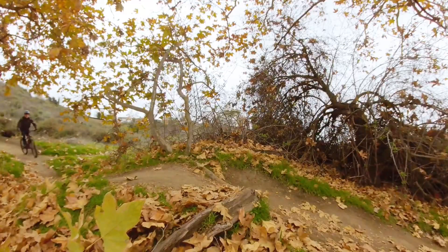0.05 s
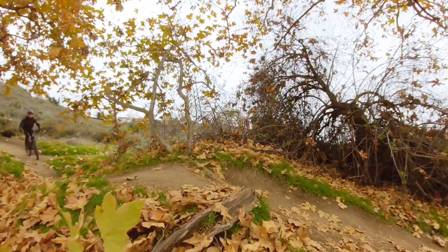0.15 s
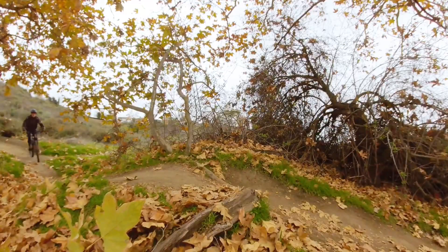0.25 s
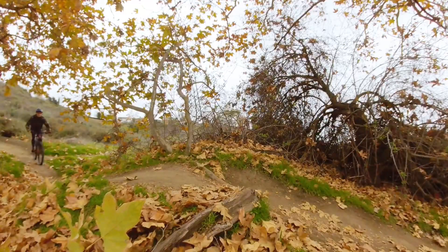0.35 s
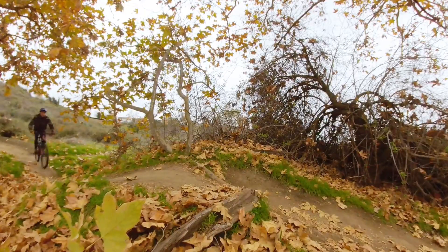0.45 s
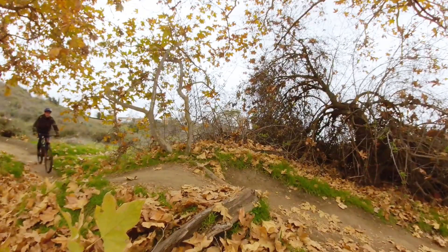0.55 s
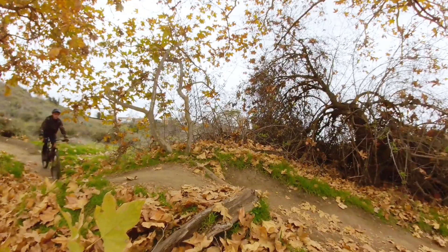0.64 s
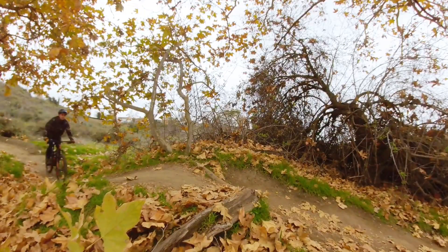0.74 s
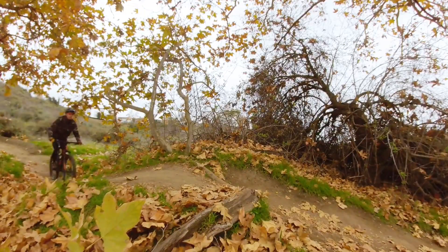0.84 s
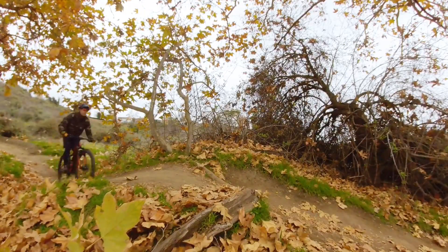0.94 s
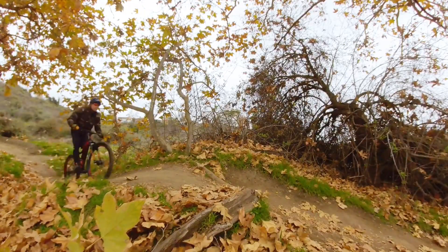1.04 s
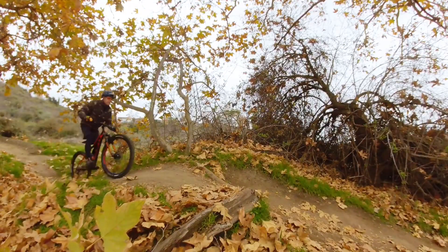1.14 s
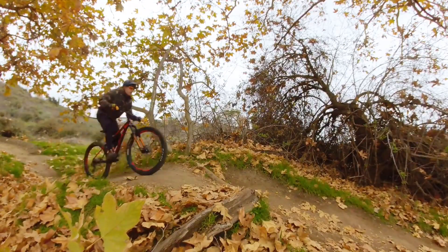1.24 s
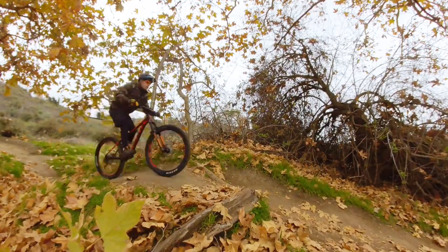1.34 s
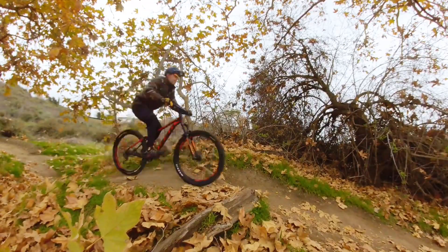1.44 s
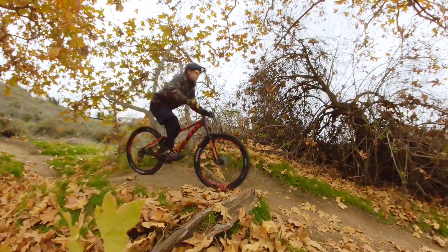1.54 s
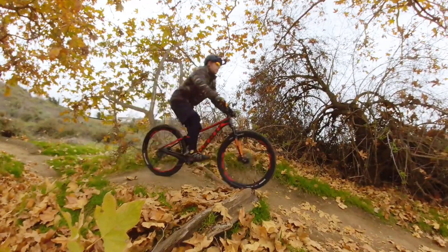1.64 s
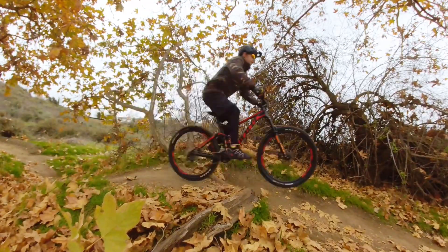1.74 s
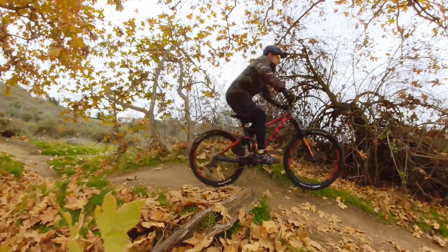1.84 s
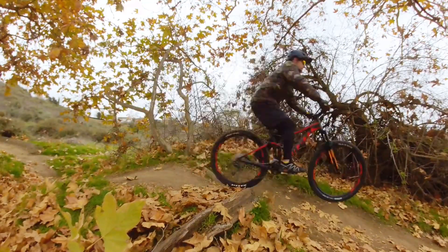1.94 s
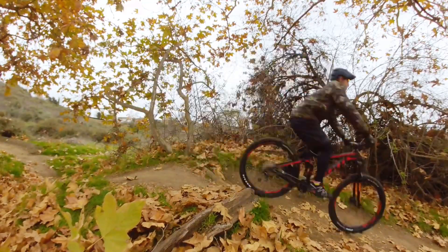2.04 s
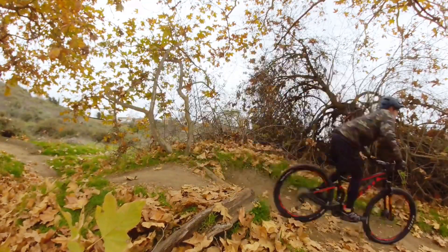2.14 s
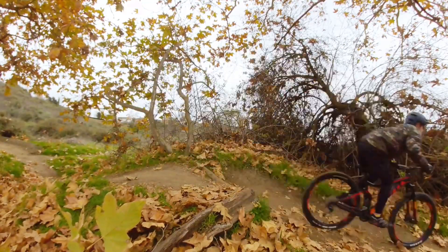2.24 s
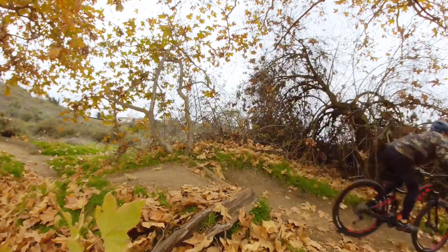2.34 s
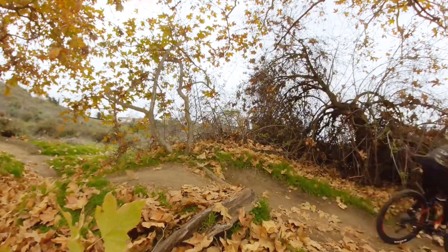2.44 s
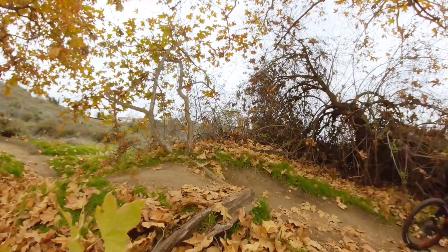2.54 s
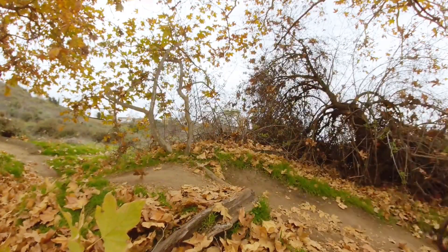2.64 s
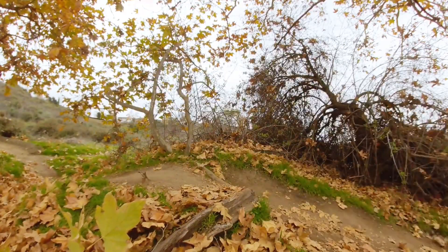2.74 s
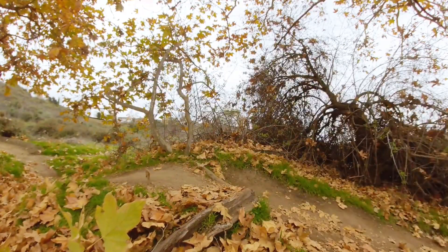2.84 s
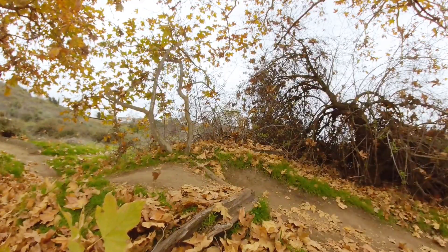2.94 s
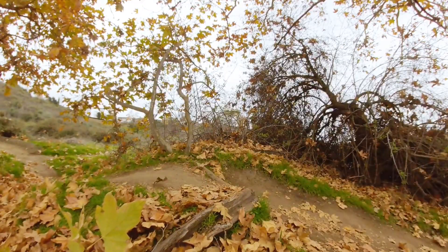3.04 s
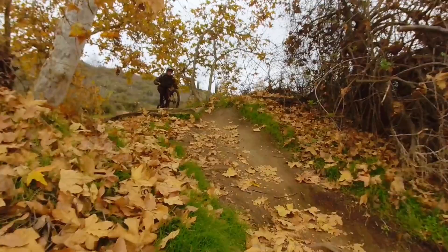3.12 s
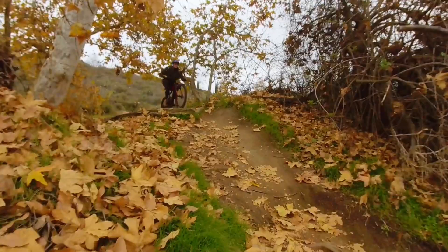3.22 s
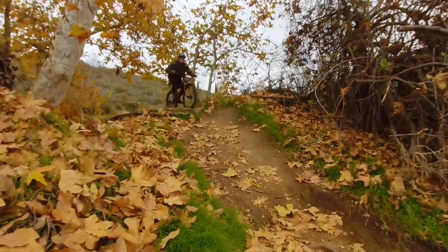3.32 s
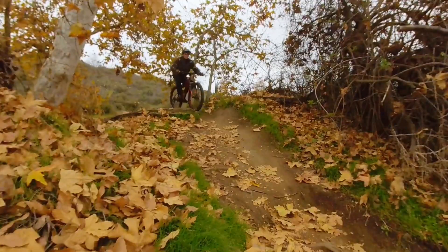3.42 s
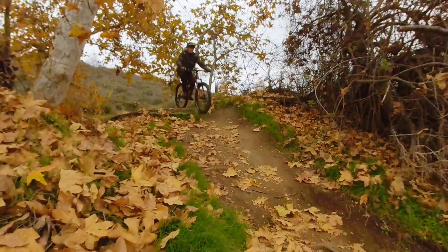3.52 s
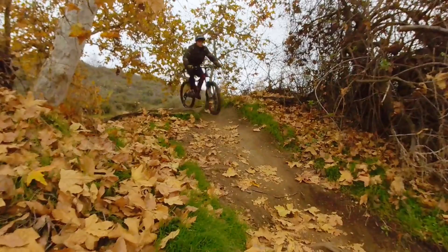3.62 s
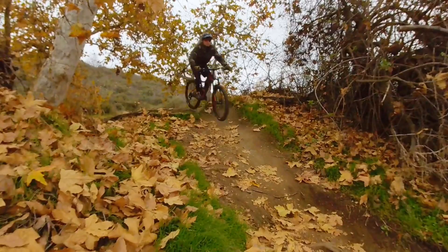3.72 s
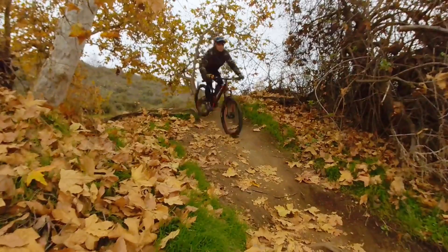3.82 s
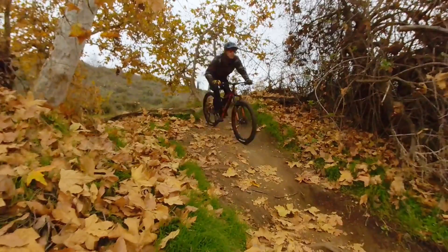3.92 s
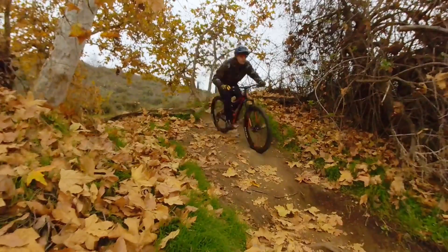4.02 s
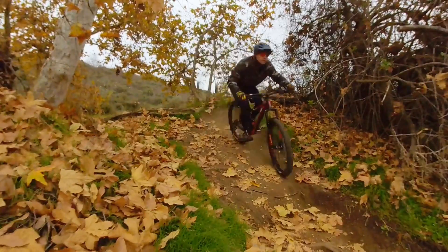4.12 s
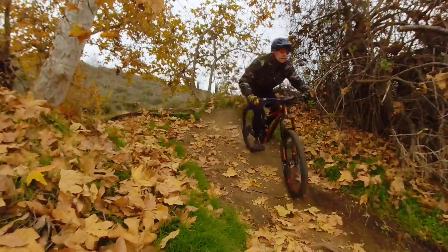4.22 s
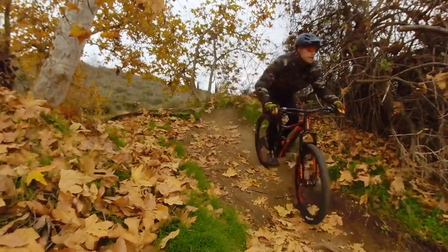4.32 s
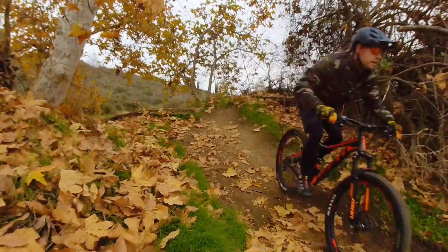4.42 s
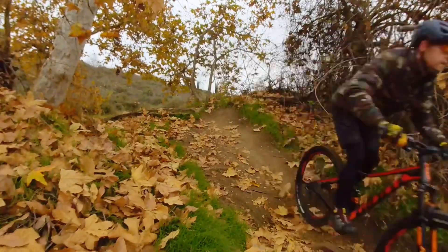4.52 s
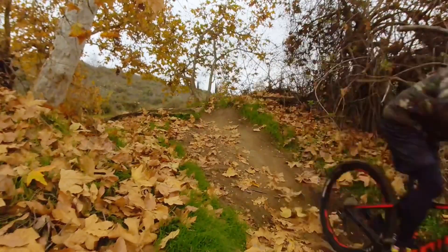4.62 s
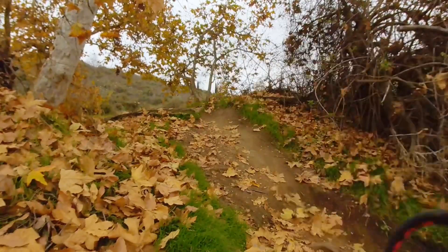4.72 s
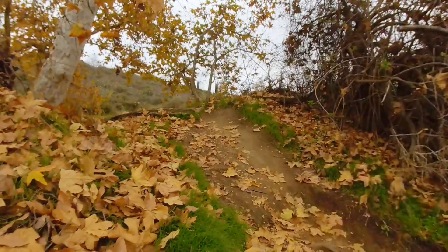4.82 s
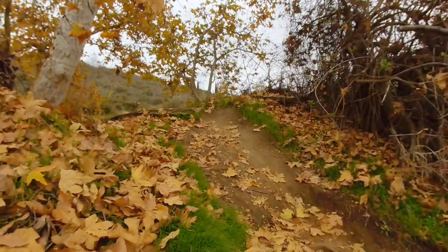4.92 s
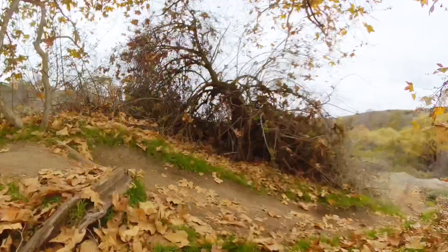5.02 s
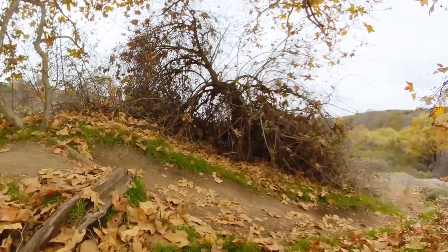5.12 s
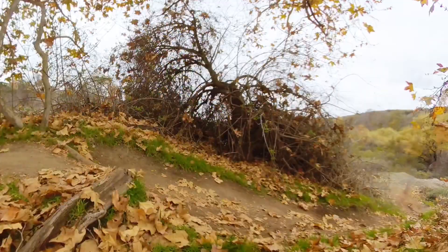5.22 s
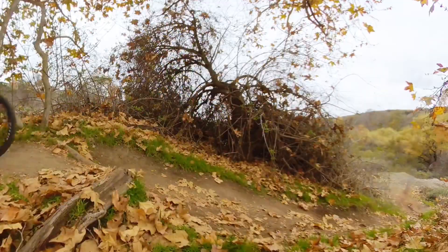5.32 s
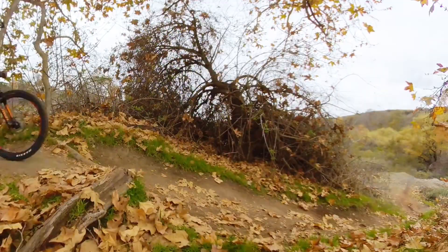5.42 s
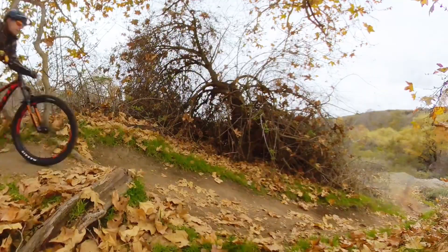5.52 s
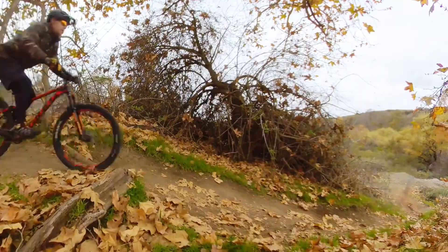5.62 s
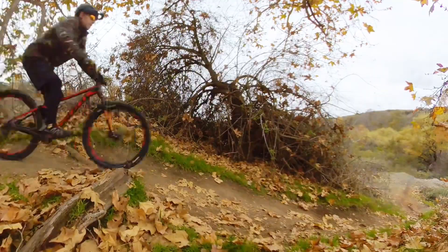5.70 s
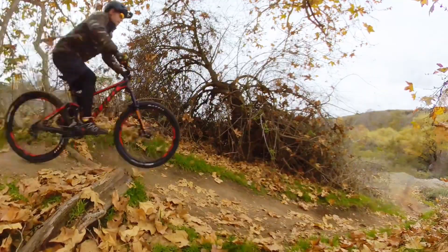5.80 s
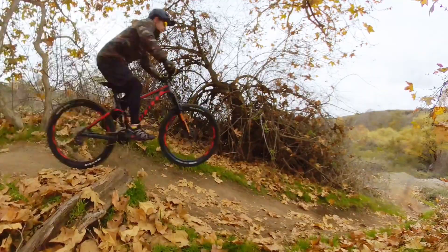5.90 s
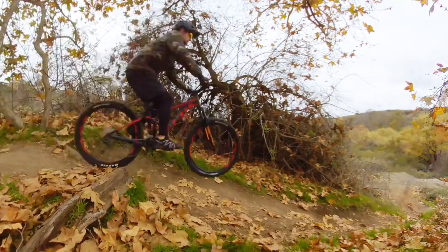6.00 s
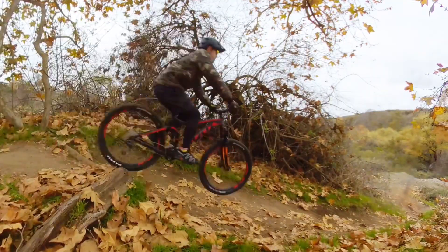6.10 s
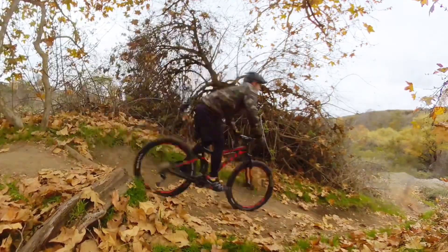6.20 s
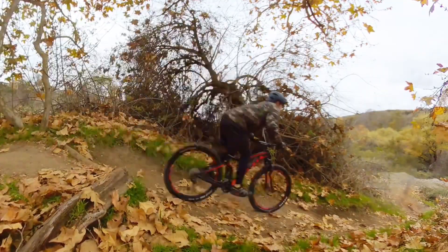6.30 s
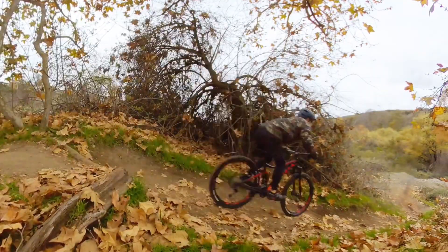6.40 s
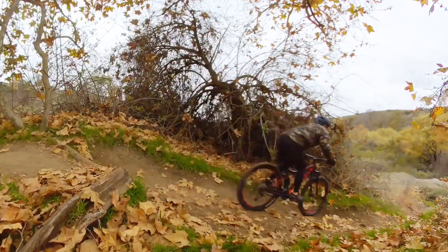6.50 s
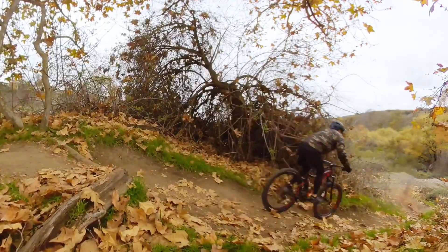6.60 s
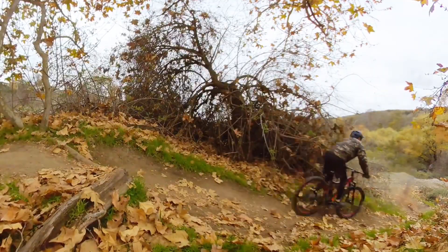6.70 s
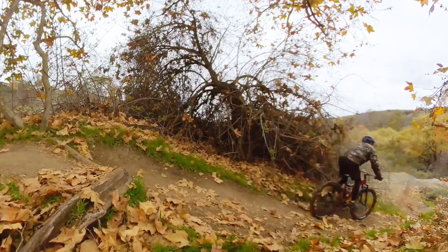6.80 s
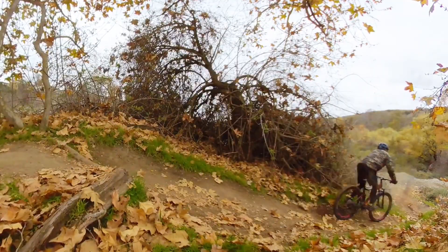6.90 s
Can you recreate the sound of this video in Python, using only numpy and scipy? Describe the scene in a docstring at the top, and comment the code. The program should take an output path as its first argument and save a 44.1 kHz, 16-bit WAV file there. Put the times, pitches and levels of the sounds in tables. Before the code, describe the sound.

A mountain bike rolls past twice over dry fallen leaves and dirt, tyres crackling, snapping and crunching, then a softer third pass begins.

```python
"""Mountain bike on a leafy dirt trail

A bike rolls past a close microphone twice; each pass fades out, then part of the first returns, softer.
Rolling: random impulses, filtered and made patchy, give tyre rumble, grit patter and leaf rustle.
Leaf snaps and crunches: bursts of impulses through chance resonances, under sharp or swelling envelopes.
High twig ticks, low tyre thuds and frame knocks: short decaying sines."""
import sys
import numpy as np
from scipy import signal
from scipy.io import wavfile
from scipy.ndimage import uniform_filter1d

SR = 44100
rng = np.random.default_rng(int(sys.argv[2]) if len(sys.argv) > 2 else 0)


def wrap_up_sound(samples):
    """Save the sound to the file named by the first command line argument, as 16-bit audio."""
    columns = np.atleast_2d(samples).T
    # keep every value between -1 and 1, then stretch to whole-number steps
    tamed = np.clip(columns, -1, 1)
    steps = np.round(tamed * 32767).astype(np.int16)
    wavfile.write(sys.argv[1], SR, steps)


def boost_factor(decibels):
    """Convert a level in decibels to a linear amplitude factor."""
    exponent = np.asarray(decibels, float) / 20
    return 10 ** exponent


N = 306693  # samples
CONTACT_REF_DB = -45


def evened(x):
    """Scales to rms 1."""
    return x / np.sqrt(np.mean(x ** 2) + 1e-20)


def read(points, hz):
    """Reads a spectrum, joined on a log-frequency axis."""
    f, value = np.transpose(points)
    return np.interp(np.log(hz + 1), np.log(f + 1), value)


def add(mix, start_s, sound):
    """Mixes a sound in at start_s."""
    part = mix[round(start_s * SR):][:len(sound)]
    part += sound[:len(part)]


def colour(x, db_at):
    """Minimum-phase filter: the phase follows from the log gain, so clicks ring after they land."""
    hz = abs(np.fft.fftfreq(4096, 1 / SR))
    log_gain = np.log(boost_factor(np.maximum(db_at(hz), -90)))
    response = np.exp(np.conj(signal.hilbert(log_gain)))
    taps = np.fft.ifft(response).real[:2048]
    return signal.oaconvolve(x, taps)[:len(x)]


def cracks(size, per_s, spread_db):
    """Tiny fractures at random moments, most small, a few large."""
    when, how_big = rng.random((2, size))
    strength = rng.standard_normal(size)
    rarity = -np.log(np.maximum(how_big, .03))  # bounds the largest
    return strength * (when < per_s / SR) * boost_factor(spread_db * rarity)


def patchy(x, patchy_db, size, bins, frames):
    """Uneven ground: random patches in time and pitch swell and sink."""
    z = signal.stft(x, nperseg=size)[2]
    patches = rng.standard_normal(z.shape[::-1]).T
    patches = uniform_filter1d(patches, bins, 0)
    patches = evened(uniform_filter1d(patches, frames, 1))
    return signal.istft(z * boost_factor(patchy_db * patches), nperseg=size)[1][:len(x)]


def level(follows, db, swells):
    """A layer follows ground contact (dB per dB, db at the reference); bell-shaped swells add power."""
    # bite of the tread on dirt, from nearness and load, one list a pass: t/s, level/dB
    contact_passes = [
        [(0, -48.5), (0.7, -47), (1.35, -48), (1.72, -41.5), (1.87, -54), (1.93, -44.5), (2.03, -40.5),
         (2.13, -33), (2.4, -46.5), (2.6, -44.5), (2.75, -50), (2.92, -48), (3.0, -54), (3.05, -48)],
        [(3.06, -57), (3.4, -55.5), (3.5, -47.5), (3.66, -60), (3.88, -59.5), (3.92, -43), (4.33, -37.5),
         (4.44, -31), (4.6, -34), (4.77, -37), (4.885, -32.5), (4.91, -31.5)],
    ]
    t = np.arange(N) / SR
    contact_db = np.interp(t, *np.transpose(contact_passes[0] + contact_passes[1]))
    power = boost_factor(2 * (db + follows * (contact_db - CONTACT_REF_DB)))
    for centre_s, swell_db, length_s in swells:
        power = power + boost_factor(2 * swell_db) * np.exp(-(2.5 * (t - centre_s) / length_s) ** 2)
    return np.sqrt(power)


def tyre_db(hz):
    """Spectrum of the knobs' thud with the modes of the air-filled tyre standing on it."""
    # thud of knobs on dirt: f/Hz, relative density/dB
    thud_points = [(30, -37.5), (85, -26), (130, -3), (170, 1), (400, -1.5), (900, -19), (1500, -29.5)]
    # tyre modes: f/Hz, width/Hz, level re thud/dB
    tyre_modes = [(173.5, 35, 9), (215, 20, 10)]
    peaks = sum(boost_factor(2 * db) / (1 + (2 * (hz - f) / width_hz) ** 2) for f, width_hz, db in tyre_modes)
    return read(thud_points, hz) + 10 * np.log10(1 + peaks)


def tyre_rumble():
    """Knobs thud on dirt into the tyre; the deepest ring varies apart from the rest."""
    # gain below 270 Hz: t/s, gain/dB
    deep_points = [(0.198, -3), (1.2, -14.5), (1.6, -1), (2.6, 0.5), (3.1, -2)]
    # wheel loaded by a dip or root, tyre booms: t/s, level/dB, length/s
    jolts = [(1.05, -37.5, 0.56), (1.914, -35, 0.034), (2.15, -25.5, 0.033), (2.306, -38.5, 0.12),
             (2.8, -41.5, 0.29), (4.021, -35.5, 0.2), (4.342, -39.5, 0.13), (4.55, -32, 0.1),
             (4.757, -31.5, 0.12)]
    rumble = colour(patchy(cracks(N, 2000, 0.46), 3.3, size=1024, bins=3, frames=5), tyre_db)
    deep = signal.oaconvolve(rumble, signal.firwin(2001, 270, fs=SR), "same")
    deep_gain = boost_factor(np.interp(np.arange(N) / SR, *np.transpose(deep_points)))
    rumble = rumble + deep * (deep_gain - 1)
    return evened(rumble) * level(0.77, -47.5, jolts)


def grit_patter():
    """Grit patters as sparse small impacts."""
    # grit spectrum: f/Hz, relative density/dB
    grit_points = [(180, -26.5), (330, -0.5), (749, -1.5), (1650, -7.5), (2700, -9), (6000, -23),
                   (7800, -11), (13200, -120)]
    grit = patchy(cracks(N, 4000, 0.88), 3.5, size=512, bins=2, frames=5)
    grit = colour(grit, lambda hz: read(grit_points, hz))
    return evened(grit) * level(0.97, CONTACT_REF_DB, [])


def leaf_rustle():
    """Leaves rub and tick in dense small fractures, louder in drifts."""
    # leaf spectrum: f/Hz, relative density/dB
    rustle_points = [(900, -26), (2700, -3.5), (5240, -5.5), (8420, -1.5), (10700, -13.5), (14600, -12),
                     (15500, -26.5)]
    # wheel ploughs through a drift of leaves: t/s, level/dB, length/s
    drifts = [(1.013, -40.5, 0.14), (1.605, -42.5, 0.095), (1.921, -36, 0.052), (2.178, -28.5, 0.1),
              (2.575, -44, 0.26), (2.807, -40.5, 0.11), (4.028, -37, 0.13), (4.564, -28.5, 0.11),
              (4.704, -35, 0.16), (4.863, -26, 0.061)]
    rustle = patchy(cracks(N, 13000, 0.43), 3.3, size=256, bins=16, frames=4)
    rustle = colour(rustle, lambda hz: read(rustle_points, hz))
    return evened(rustle) * level(0.85, -53.5, drifts)


def shards(centre_hz, octaves, sharpness, skirt_db):
    """A leaf or heap rings at its pitch and at chance ones around it, above a broad skirt."""
    # colour at the microphone port: f/Hz, gain/dB
    port_points = [(300, 9.5), (5000, 3.5), (7800, 8), (11000, -2), (15500, -3.5)]
    ring_hz = centre_hz * 2 ** (octaves * np.r_[0, rng.standard_normal(9)])
    strength = np.r_[1, .35 * rng.random(9)]

    def db_at(hz):
        """Rings and skirt in dB, with port colour and low cut."""
        rings = strength / (1 + (2 * sharpness * (hz[:, None] / ring_hz - 1)) ** 2)
        falloff = 1 + (hz / centre_hz / 19.0) ** 3 + (centre_hz / (hz + 1) / 4.9) ** 2
        power = rings.sum(1) + boost_factor(2 * skirt_db) / falloff
        low_cut_db = -60 * np.log10(1 + 150 / (hz + 1))
        return 10 * np.log10(power) + read(port_points, hz) + low_cut_db
    return db_at


def snap(db, hz, fizz_db):
    """A broadband crack runs through a brittle leaf in a few ms; its shards ring and then settle."""
    t = np.arange(int(.2 * SR)) / SR
    ring_t60_s, settle_t60_s = 0.042, 0.3
    fracture = cracks(len(t), 15000, 1.4)
    rise = 1 - np.exp(-t / 0.0016)
    fall_db = -60 * t / ring_t60_s
    crack = evened(colour(fracture, shards(hz, 0.79, 12.0, fizz_db - 6))) * boost_factor(1.1 * fall_db)
    ring = evened(colour(fracture, shards(hz, 0.67, 6.5, fizz_db)))
    ring = ring * (.5 * boost_factor(fall_db) + boost_factor(-11.0 - 60 * t / settle_t60_s))
    return boost_factor(db - 9.0) * rise * (crack + ring)


def crunch(db, hz, length_s):
    """A clump of fractures swells and dies as the tread squeezes a heap of leaves and twigs."""
    dull_hz = 8500  # heaps lie in the dirt and lose the top that a snapping leaf keeps
    t = np.arange(int(.2 * SR)) / SR
    u = t / max(length_s, .005) * 3.16
    squeeze = u ** 2 * np.exp(2 * (1 - u)) + 0.56 * (1 - np.exp(-u)) * np.exp(-t / 0.019)
    pieces = shards(hz, 0.45, 3.6, -20)
    clump = cracks(len(t), 5000, 1.5)
    burst = colour(clump, lambda f: pieces(f) - 10 * np.log10(1 + (f / dull_hz) ** 8))
    return boost_factor(db - 7.5) * evened(burst) * squeeze


def struck_tone(db, hz):
    """A high twig tick or low tyre thud rings a few cycles, with an overtone of chance pitch."""
    t60_cycles = 10.6
    cycles = np.arange(int(.06 * SR)) / SR * hz
    overtone = np.sin(2 * np.pi * rng.uniform(2.0, 2.1) * cycles)
    ring = np.sin(2 * np.pi * cycles) + .5 * overtone
    return boost_factor(db - 60 * cycles / t60_cycles) * np.minimum(cycles, 1) * ring


def knock(db):
    """A stick or stone rings the frame tube at its modes, each detuned a little by where it is struck."""
    # frame modes: f/Hz, level/dB, t60/s
    frame_modes = [(905, 3, 0.019), (2123, -16.5, 0.026), (3574, -8.5, 0.028)]
    t = np.arange(int(.1 * SR)) / SR
    ring = 0
    for hz, mode_db, t60_s in frame_modes:
        struck_hz = hz * rng.uniform(0.96, 1.07)
        ring = ring + boost_factor(mode_db - 60 * t / t60_s) * np.sin(2 * np.pi * struck_hz * t)
    return boost_factor(db) * (1 - np.exp(-t / 0.00063)) * ring


def ramp(since_s):
    """A fader opening linearly over 0.16 s."""
    return np.clip(since_s / .16, 0, 1)


def replay(ride, t):
    """The ride delayed, softened and faded in after the second pass."""
    delay_samples, start_s, replay_db = 181139, 4.957, -6
    again = np.concatenate([np.zeros(delay_samples), ride])[:N]
    return again * boost_factor(replay_db) * ramp(t - start_s)


def scene():
    """Both passes, then part of the first again."""
    # brittle leaves cracking at once: t/s, level/dB, centre f/Hz, fizz skirt re ring/dB
    snap_events = [(0.1, -33, 5800, -14), (0.387, -30.5, 5500, -9), (0.493, -40, 7200, -12),
                   (0.62, -31, 6500, -17), (0.7534, -27, 5650, -14), (0.866, -27.5, 1210, -14),
                   (0.996, -20.5, 8500, -35), (1.199, -30.5, 6260, -32), (1.6709, -17, 2740, -9),
                   (1.763, -27, 2480, -19), (1.796, -32, 3600, -8), (1.8823, -31, 2200, -10),
                   (2.003, -28, 7500, 5), (1.9665, -22, 2580, -18), (2.138, -11, 2700, -5),
                   (2.1943, -6, 6230, 8), (2.2372, -9, 8500, -4), (2.2593, -21, 4200, -14),
                   (2.274, -5.5, 5480, -11), (2.338, -11, 8150, -3), (2.501, -22.5, 9600, -12),
                   (2.548, -26, 2350, -2), (2.612, -26.5, 3700, -21), (2.812, -18, 5130, -5),
                   (2.871, -9.5, 6900, -12), (2.872, -8, 13300, -29), (3.03, -26, 4200, -37),
                   (3.184, -43, 4530, -12), (3.509, -39, 6760, -15), (3.535, -33, 5700, -15),
                   (3.566, -33.5, 3230, -11), (4.0038, -14.5, 4440, 1), (4.0604, -1.5, 7700, -7.5),
                   (4.126, -23.5, 4500, -14), (4.231, -16, 7000, 10), (4.489, -12.5, 8700, 4),
                   (4.578, -14.5, 5450, -2), (4.598, -20, 7440, -25), (4.62, -2, 8250, -6.5),
                   (4.635, -11, 7400, -8), (4.781, -16.5, 3860, -40), (4.8076, 2, 8370, -8),
                   (4.839, -16, 6900, -3.5)]
    # heaps of leaves and twigs crushed over a moment: t/s, level/dB, centre f/Hz, length/s
    crunch_events = [(1.597, -29, 1100, 0.013), (1.675, -29, 2830, 0.056), (1.889, -32, 1900, 0.093),
                     (1.913, -22.5, 1210, 0.016), (2.089, -17.5, 750, 0.028), (2.144, -20.5, 900, 0.028),
                     (2.168, -19, 4100, 0.025), (2.763, -25, 2330, 0.047), (3.446, -37, 560, 0.021),
                     (3.897, -26, 910, 0.015), (3.954, -20.5, 880, 0.037), (4.346, -9.5, 1900, 0.058),
                     (4.352, -26, 2360, 0.049), (4.47, -12, 2100, 0.023), (4.504, -23, 990, 0.011),
                     (4.531, -12, 1500, 0.019), (4.671, -20, 880, 0.031), (4.699, -13, 1400, 0.029),
                     (4.71, -19.5, 5800, 0.04), (4.75, -23.5, 1990, 0.023), (4.868, -14, 2130, 0.033)]
    # short struck tones: high twig ticks, and low tyre thuds at 290 and 350 Hz: t/s, level/dB, f/Hz
    tone_events = [(2.0467, -10.5, 980), (2.139, -15, 290), (2.195, -14.5, 350), (2.5394, -15, 2430),
                   (4.705, -13, 1290), (4.8015, -13, 3000)]
    # sticks or stones on the frame: t/s, level/dB
    knock_events = [(2.7615, -16.5), (2.7688, -22.5)]
    # hand fades, one row a pass: start t/s, end t/s
    pass_fades = [(-1, 3.05), (3.075, 4.937)]
    t = np.arange(N) / SR
    ride = tyre_rumble() + grit_patter() + leaf_rustle()
    for start_s, *row in snap_events:
        add(ride, start_s - .001, snap(*row))
    for start_s, *row in crunch_events:
        add(ride, start_s - .006, crunch(*row))
    for start_s, *row in tone_events:
        add(ride, start_s, struck_tone(*row))
    for start_s, db in knock_events:
        add(ride, start_s, knock(db))
    ride *= sum(ramp(t - start_s) * ramp(end_s - t) for start_s, end_s in pass_fades)
    return (ride + replay(ride, t))[None]


def low_pass(x, edge_hz):
    """Linear-phase low-pass."""
    return signal.oaconvolve(x, signal.firwin(255, edge_hz, window=("kaiser", 7), fs=SR)[None], "same")


def roll_off(x):
    """The treble ends steeply here."""
    return signal.sosfilt(signal.butter(12, 16970, fs=SR, output="sos"), x)


def record(dry):
    """Full-scale clip, band limit, a top band let through only while loud, and converter offset."""
    x = np.clip(dry, -1, 1)
    body = low_pass(x, 12800)
    top = low_pass(x, 15800) - body
    top_db = 10 * np.log10(abs(uniform_filter1d(top ** 2, size=1500)) + 1e-14)
    gate = np.clip((top_db + 66) / 3, 0, 1)  # opens from -66 to -63 dB
    offset = -.0003
    return roll_off(body + gate * top + offset)


dry = scene()
out = record(dry)
wrap_up_sound(out)
```